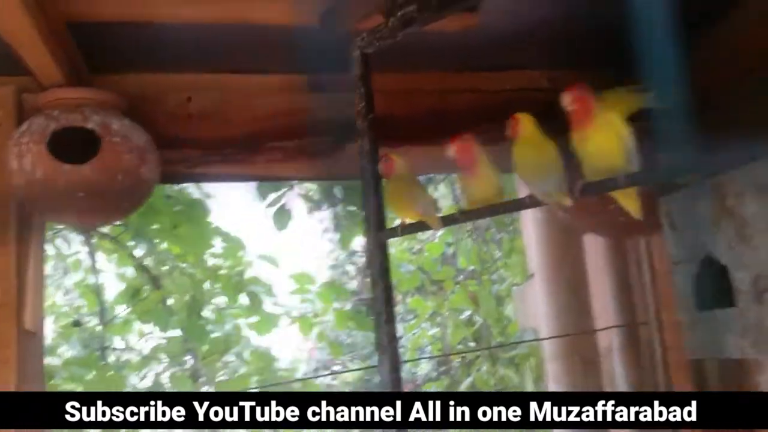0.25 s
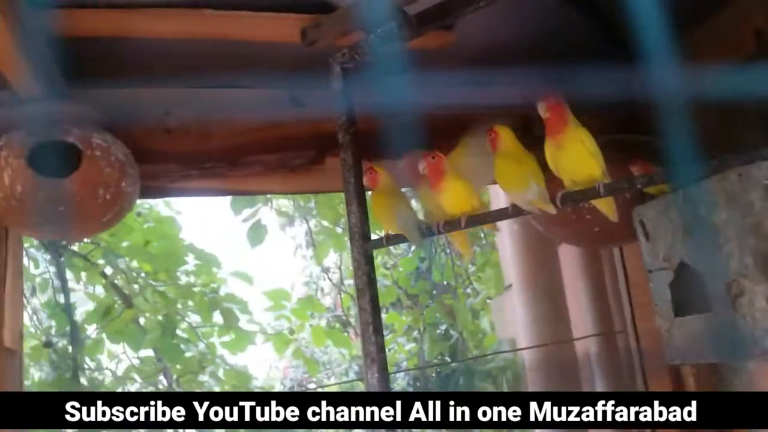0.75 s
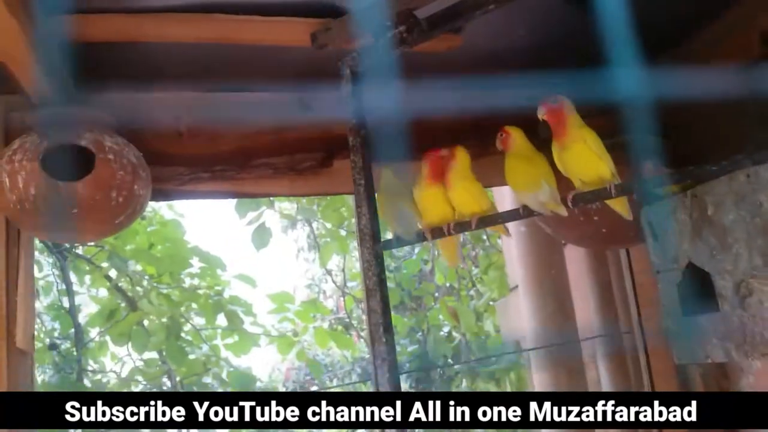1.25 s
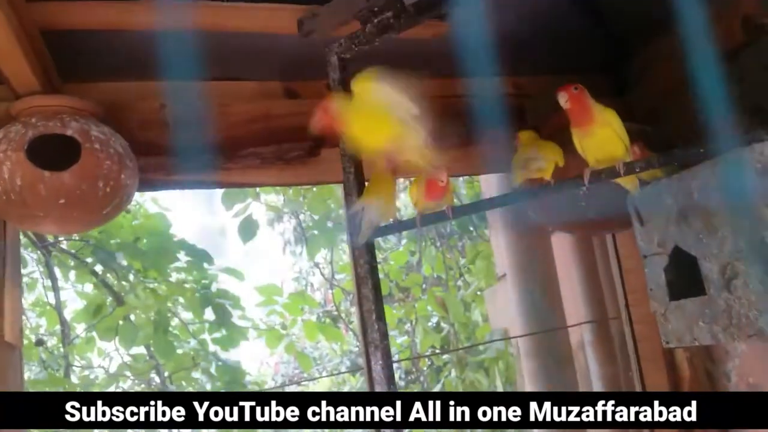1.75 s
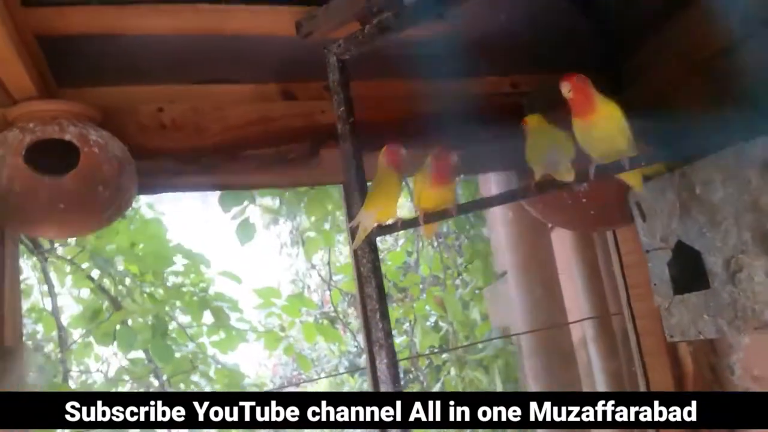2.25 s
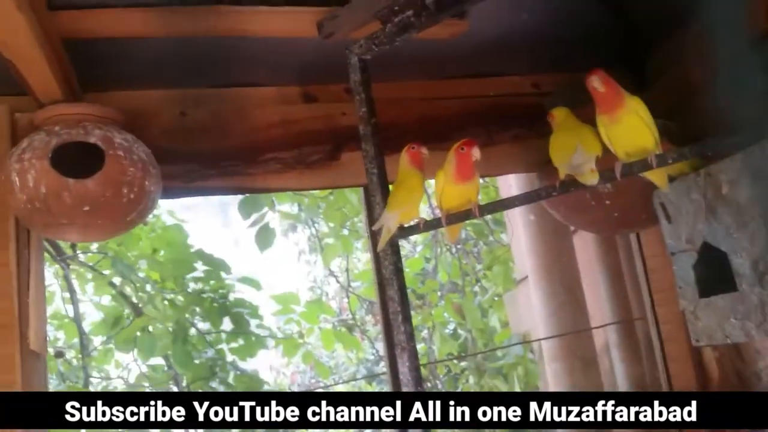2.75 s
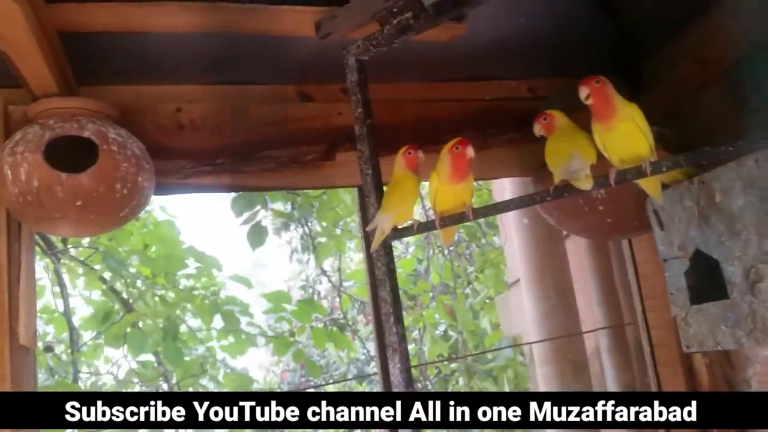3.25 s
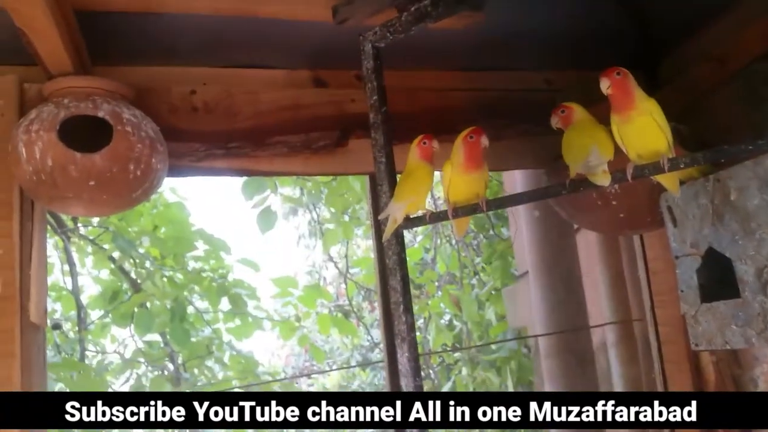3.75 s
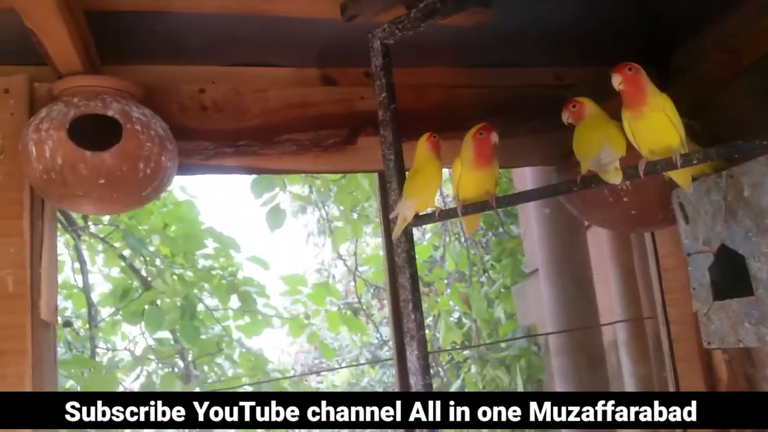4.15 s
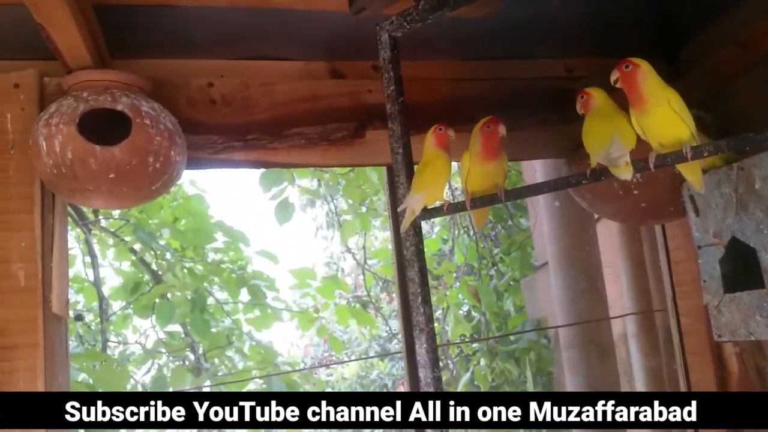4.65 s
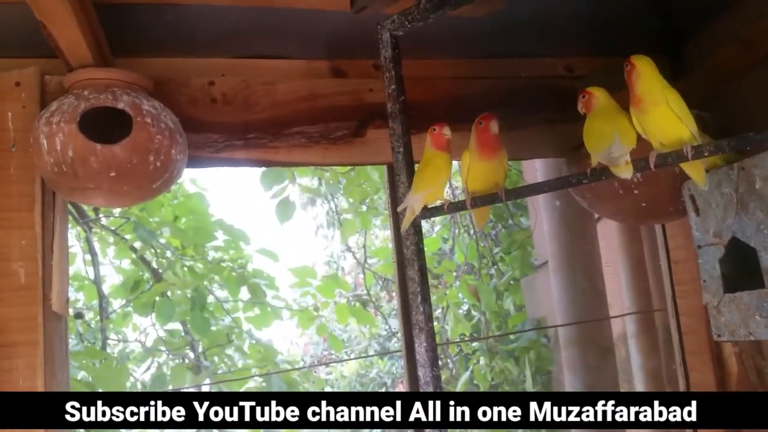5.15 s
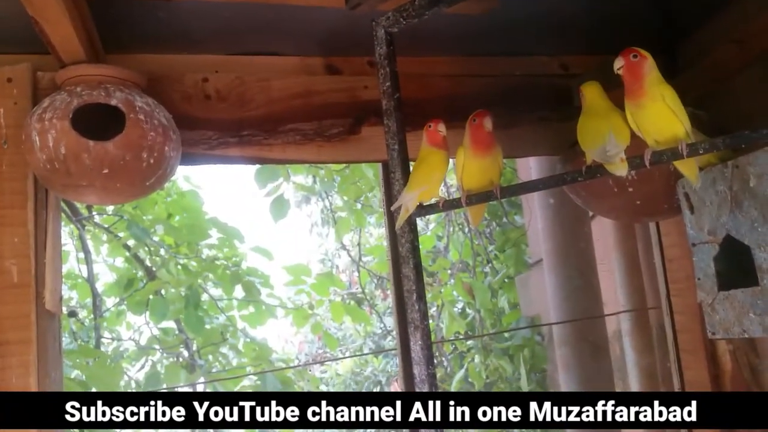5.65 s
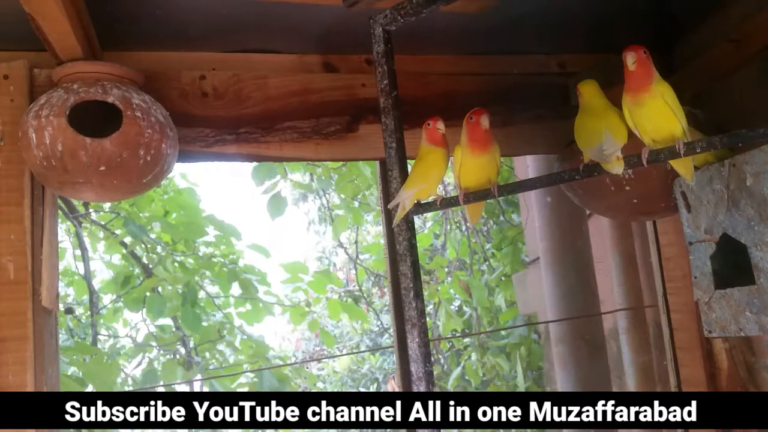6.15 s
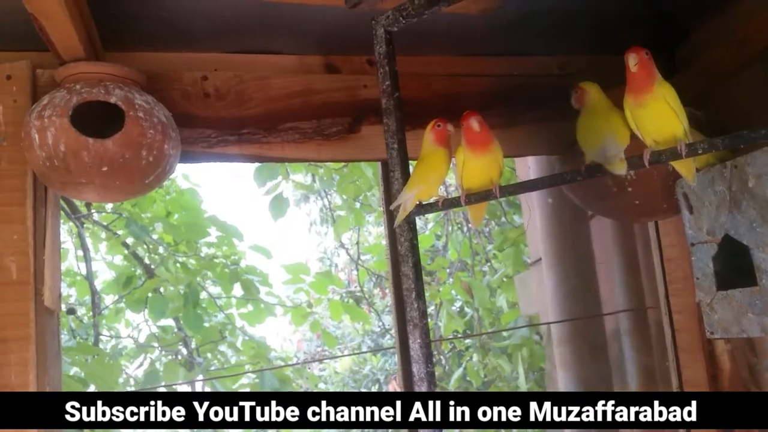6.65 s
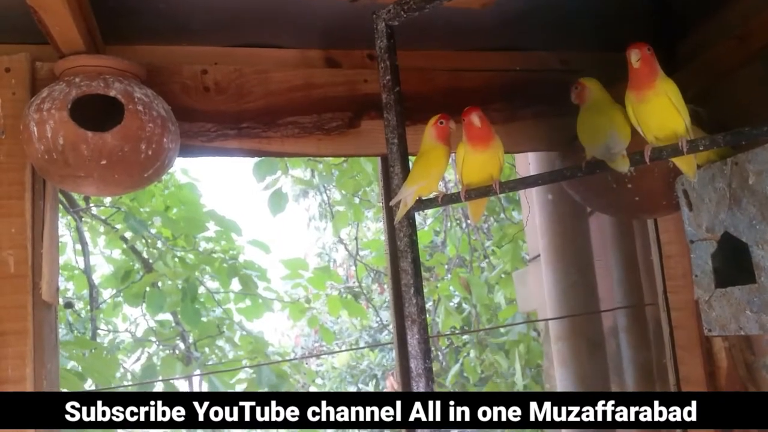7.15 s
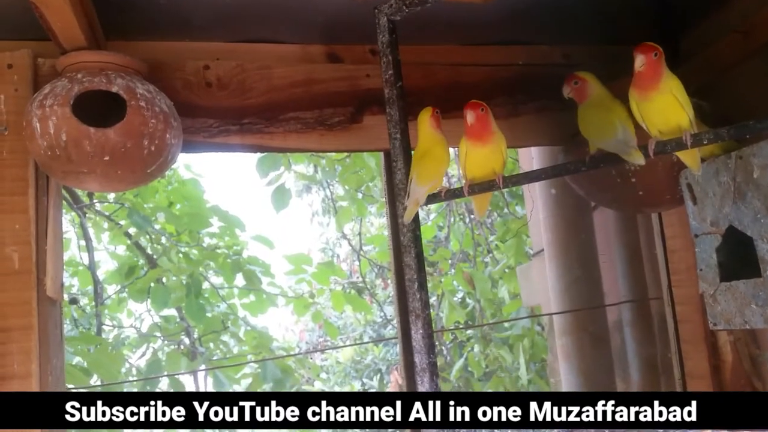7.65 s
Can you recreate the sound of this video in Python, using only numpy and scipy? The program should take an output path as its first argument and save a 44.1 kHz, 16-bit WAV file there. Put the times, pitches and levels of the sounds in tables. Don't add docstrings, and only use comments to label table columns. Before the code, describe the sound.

Scattered piercing lovebird squawks with wing gusts and handling knocks give way to a fast, steady run of sharp overlapping chirps.

```python
import sys
import numpy as np
from scipy import signal
from scipy.fft import rfft, irfft, next_fast_len
from scipy.io import wavfile
from scipy.ndimage import uniform_filter1d

SR = 44100
rng = np.random.default_rng(int(sys.argv[2]) if len(sys.argv) > 2 else 0)


def dump_mix(stems):
    frames = np.atleast_2d(stems).T
    limited = np.clip(frames, -1, 1)
    pcm = np.round(limited * 32767).astype(np.int16)
    wavfile.write(sys.argv[1], SR, pcm)


def decibels_to_gain(level_db):
    exponent = np.asarray(level_db, float) / 20
    return 10 ** exponent


N = 348831


def shape(x, table):
    size = next_fast_len(x.shape[-1])
    hz, db = np.transpose(table)
    bin_hz = np.arange(size // 2 + 1) * SR / size
    gain = decibels_to_gain(np.interp(np.log(bin_hz + 1), np.log(hz), db))
    return irfft(rfft(x, size) * gain, size)[..., :x.shape[-1]]


def unit(x):
    return x / np.sqrt(np.mean(x ** 2))


def walk(rate, size=N):
    k = max(int(SR / rate), 1)
    steps = np.repeat(rng.standard_normal(size // k + 1), k)
    return 1.27 * uniform_filter1d(uniform_filter1d(steps, k), k)[:size]


def swell(t, start, end, db, up_db_s, down_db_s):
    rise_db = up_db_s * np.maximum(start - t, 0)
    fade_db = down_db_s * np.maximum(t - end, 0)
    return decibels_to_gain(db - rise_db - fade_db) ** 2


def hiss():
    # hz, level_db
    cavity_colour = [(2200, -34), (3000, -8.5), (3600, 3), (4100, -5.5), (4800, -10.5), (5300, -39),
                     (6000, -44.5)]
    cavity = shape(rng.standard_normal(N), cavity_colour)
    veil = shape(rng.standard_normal((2, N)), [(5500, -48.5), (9000, -31.0), (11500, -15.0),
                                               (14000, -8.5), (15500, -3.5), (15900, -56.0)])
    return decibels_to_gain(-50) * unit(cavity) * np.array([[1], [.08]]) + decibels_to_gain(-74.5) * unit(veil)


def outdoors():
    # hz, level_db
    rumble_colour = [(18, -47.5), (30, -5), (76, -7), (257, -6), (433, -13.5), (484, -14), (522, -16),
                     (1380, -20.5), (2600, -35), (3380, -80), (5720, -120)]
    both, left, right = rng.standard_normal((3, N))
    ports = np.array([.5 * both + left, .5 * np.roll(both, 6) + 0.47 * right])
    return unit(shape(ports, rumble_colour)) * decibels_to_gain(-47 + walk(3.044))


def soft_whistles():
    # time_s, pitch_hz, level_db
    whistles = [
        [(4.0, 1760, -66), (4.03, 1720, -52), (4.06, 1480, -55), (4.09, 1476, -60), (4.11, 1790, -55.5),
         (4.16, 1830, -44), (4.21, 1678, -49), (4.25, 1635, -80)],
        [(4.28, 1360, -60.5), (4.33, 1275, -63), (4.44, 1216, -67), (4.5, 1285, -57)],
        [(3.745, 1990, -57), (3.775, 2230, -48), (3.79, 2930, -44)],
    ]
    out = np.zeros(N)
    for s, hz, db in map(np.transpose, whistles):
        add(out, s, hz, db, [0], -60, wobble=0.007, flutter_db=5.0, breath=0.059, rasp=0.0077, count=1)
    return out


def wings_and_fingers():
    # start_s, length_s, level_db
    gusts = [(0.13, 0.2, -46.5), (0.604, 0.15, -40.5), (1.633, 0.11, -39), (1.897, 0.095, -43),
             (2.157, 0.023, -37), (2.26, 0.28, -43.5), (6.474, 0.37, -52), (7.42, 0.031, -56.5),
             (7.74, .15, -49.5)]
    # peak_s, level_db
    strokes = [(2.89, -36.5), (3.04, -35.5), (3.17, -35), (3.315, -47), (3.35, -39.5), (3.39, -40.5),
               (3.43, -35.5), (3.46, -33), (3.49, -30), (3.52, -34.5), (3.555, -45), (4.05, -51.5)]
    t = np.arange(0, N, 64) / SR

    def strength(power):
        return np.interp(np.arange(N) / SR, t, np.sqrt(power))

    breeze = decibels_to_gain(-54) ** 2
    gust = strength(breeze + sum(swell(t, s, s + length, db, 254, 98.5) for s, length, db in gusts))
    grip = swell(t, 4, 4.73, -50, 93, 93)
    press = strength(grip + sum(swell(t, s, s, db, 204, 159) for s, db in strokes))

    shared, own = rng.standard_normal((2, N))
    low = unit(shape(shared, [(20, -10), (50, 0.5), (80, -0.5), (130, -2), (250, -10.0), (450, -9),
                              (900, -52.5)])) * decibels_to_gain(1.2 * walk(26))
    rub = unit(shape(own, [(20, -23.5), (80, 9.0), (200, 13.5), (400, 1.0), (900, -62)])) * decibels_to_gain(2.9 * walk(30))
    upper = unit(shape(own, [(250, -23.0), (400, -0.5), (800, -4.0), (1500, -9.0), (3000, -16.5),
                             (4500, -66.0)])) * decibels_to_gain(4.5 * walk(30))
    wings = (gust + 0.14 * press) * low
    fingers = press * (1.87 * rub + decibels_to_gain(-4.5) * upper)
    left = wings + decibels_to_gain(-8.0) * gust * upper + fingers
    right = np.roll(0.96 * wings + decibels_to_gain(-17.0) * gust * upper, 7)
    return np.array([left, right])


def knocks():
    # start_s, level_db, pitch_hz, decay_s, brightness_db
    bumps = [(2.856, -30, 124, 0.03, -28), (2.885, -24, 380, 0.042, -13.5), (2.923, -19, 150, 0.017, -24),
             (2.963, -33, 388, 0.04, -23), (3.013, -27, 109, 0.06, -22), (3.149, -28.5, 127, 0.12, -22),
             (3.333, -34.5, 185, 0.048, -13), (3.309, -35, 172, .05, -23), (3.476, -28, 157, 0.032, -20),
             (3.669, -20, 111, 0.036, -40), (3.841, -27.5, 80.7, 0.048, -24),
             (4.05, -17, 180, 0.031, -35.5), (4.112, -27, 107, 0.1, -59), (4.394, -22, 239, 0.03, -42),
             (4.519, -27, 247, 0.048, -24), (4.6, -29.5, 241, 0.073, -24), (6.48, -31, 80.7, 0.053, -31),
             (7.437, -25.5, 127, 0.055, -44.5)]
    out, t = np.zeros(N + SR), np.arange(SR // 4) / SR
    for s, db, hz, decay_s, bright_db in bumps:
        fall = decibels_to_gain(-60 * t / max(decay_s, .005)) * np.clip(t / 0.0023, 0, 1)
        scratch = shape(rng.standard_normal(len(t)), [(100, -22), (400, 9.0), (1500, -6.0), (4000, -13.5),
                                                      (9000, -94)])
        thump = np.sin(2 * np.pi * hz * t)
        first = int(s * SR)
        out[first:first + len(t)] += decibels_to_gain(db + 3.0) * fall * (thump + decibels_to_gain(bright_db + 12.5) * unit(scratch))
    return out[:N] * np.array([[1], [.2]])


def snaps():
    # start_s, level_db
    openings = [(0.066, -46), (0.613, -51), (.79, -52), (.955, -32), (1.64, -50), (1.895, -33), (2.11, -43),
                (2.487, -38), (2.607, -45), (3.793, -45), (3.855, -38), (1.703, -40), (3.391, -35),
                (4.631, -26), (7.027, -32.5)]
    out, t = np.zeros(N), np.arange(600) / SR
    for s, db in openings:
        puff = shape(rng.standard_normal(len(t)), [(900, -39.5), (1800, 10.5), (5000, 0), (9000, -10.0),
                                                   (15000, -11.5)])
        first = int(s * SR)
        out[first:first + len(t)] += decibels_to_gain(db - 60 * t / .014) * unit(puff)
    return out


def add(out, s, hz, db, orders_db, shrill_db, wobble=0.014, flutter_db=2.0, breath=0.25, rasp=0.27, count=8):
    # hz, level_db
    throat = [(3000, -33), (6500, 0), (9200, -3), (10500, -5.5), (13000, 0.5), (15300, -1.5), (16200, -54)]
    throat_hz, throat_db = np.transpose(throat)
    i = np.arange(int(s[0] * SR), min(int(s[-1] * SR), N))
    size = len(i)

    def at(column):
        return np.interp(i / SR, s, column + 0 * s)

    pitch = at(hz) * (1 + wobble * walk(255.4, size=size))
    beat_hz = 207 * (1 + 0.1995 * walk(40, size=size))
    pitch = pitch * (1 + 0.08 * rasp * np.sin(2 * np.pi * np.cumsum(beat_hz) / SR))
    phase = 2 * np.pi * (np.cumsum(pitch) / SR + rng.random())
    note = 0
    for k in range(1, count + 1):
        if k <= len(orders_db):
            gain_db = at(orders_db[k - 1])
        else:
            gain_db = at(shrill_db) + np.interp(k * pitch, throat_hz, throat_db, right=-99)
        leak = breath * walk(1500, size=size) + rasp * walk(5000, size=size)
        rough = 1 + k ** 0.62 * leak
        note = note + decibels_to_gain(gain_db + flutter_db * walk(179.2, size=size)) * rough * np.sin(k * phase)
    edge = np.clip(np.minimum(i - i[0], i[-1] - i) / (0.00019 * SR), 0, 1)
    out[i] += np.sqrt(2) * note * decibels_to_gain(at(db)) * edge


def low_note(out, start, length, hz, db, first_db, rasp, shrill_db, swell_db):
    t = np.linspace(0, length, num=40)
    attack_s = 0.0085
    level_db = db - 14 * np.clip(1 - t / attack_s, 0, 1) + swell_db * (t / length - .5)
    add(out, start + t, hz(t), level_db, [first_db, 0], shrill_db - 5.0, wobble=.33 * rasp,
        flutter_db=3.0 + 6.6 * rasp, breath=0.12 + 2.26 * rasp, rasp=rasp)


def low_notes(out):
    # start_s, length_s, pitch_hz, second_harmonic_db, fundamental_over_second_db
    scoops = [(.61, 0.062, 2125, -37, 0.5), (1.638, 0.066, 2226, -35, 2.5), (3.333, 0.057, 2182, -35.5, -5),
              (3.792, 0.06, 2193, -34.5, 3.5)]
    climbs = [(3.501, 0.066, 2080, -36, -3), (4.47, 0.066, 2097, -41, 1), (6.972, .028, 1894, -41.5, -6),
              (7.766, .072, 2130, -42, 1)]
    held = [(.982, 0.045, 2132, -30, -7), (1.298, 0.047, 2158, -33, -5.5), (2.486, 0.025, 2586, -32, -2.5),
            (7.0, 0.023, 1905, -38, -3.5)]
    # start_s, length_s, first_hz, turning_point_hz,
    # second_harmonic_db
    hoarse_bends = [(.066, 0.063, 2433, 2267, -38.5), (.221, 0.073, 2860, 2090, -35),
                    (.788, 0.071, 2876, 2285, -34), (.955, 0.096, 2414, 2720, -38), (1.268, 0.036, 2440, 2626, -39),
                    (1.891, 0.081, 2530, 2203, -37), (2.11, .075, 2680, 2296, -36),
                    (2.312, 0.078, 2720, 2378, -36.5), (4.575, 0.054, 2260, 2080, -39.5)]
    for rows, depth, climb in [(scoops, 0.23, 0.0236), (climbs, 0.23, .16), (held, 0, 0)]:
        for k, (s, length, hz, db, first_db) in enumerate(rows):
            def clear_hz(t):
                return hz * (1 - depth * np.exp(-t / 0.0063) + climb * t / length)

            low_note(out[k % 2], s, length, clear_hz, db, first_db, rasp=.03, shrill_db=-3, swell_db=5)
    for k, (s, length, first_hz, turn_hz, db) in enumerate(hoarse_bends):
        end_hz = turn_hz + 0.308 * (first_hz - turn_hz)

        def hoarse_hz(t):
            return np.interp(t / length, [0, .62, 1], [first_hz, turn_hz, end_hz])

        low_note(out[k % 2], s, length, hoarse_hz, db, -1.5, rasp=.085, shrill_db=1.2, swell_db=.3)


def high_notes(out):
    # start_s, early_hz, late_hz, level_db, shrillness_db
    long_high = [(0, 5250, 5220, -30.5, -1), (.118, 5123, 5193, -22.5, -2.5),
                 (.292, 5150, 5303, -22.5, -4.5), (.853, 4970, 5150, -23, -9.5),
                 (1.03, 5110, 5450, -24, -4), (2.18, 5220, 5350, -26, 0.5), (2.382, 5240, 5210, -24.5, -1),
                 (2.51, 4800, 4960, -22, -8), (2.632, 4680, 4590, -24.5, -11.5),
                 (3.392, 5200, 5380, -26, -1), (3.857, 5410, 5230, -23, 2.5),
                 (4.535, 5130, 5230, -26, -3.5), (7.836, 5190, 5210, -26, -3.5)]
    short_high = [(.672, 4780, 5060, -28, -7), (1.345, 5590, 5390, -23.5, -9),
                  (1.706, 5160, 5166, -28.5, -2), (1.965, 5070, 5170, -28, -1),
                  (2.622, 5440, 5020, -29.5, -2), (3.562, 5150, 5370, -21.5, -2),
                  (4.629, 5200, 5560, -27, 1), (4.632, 3934, 4380, -26.5, 0.5),
                  (4.65, 6760, 6640, -28, 1.5), (7.027, 5224, 5350, -28, -2.5)]
    yelps = [(1.0, 5380, 5030, -28, -2), (2.607, 3190, 2530, -31.5, -10.5), (2.609, 4410, 3490, -30, -6.5),
             (4.553, 6620, 6210, -31.5, 3)]
    for rows, length_s in [(long_high, 0.033), (short_high, 0.029), (yelps, .019)]:
        for k, (start, early_hz, late_hz, db, shrill_db) in enumerate(rows):
            s = np.maximum(start + length_s * np.array([0, .05, .45, .8, .999]), 0)
            middle_hz = 1.015 * (early_hz + late_hz) / 2
            hz = np.array([0.958 * early_hz, early_hz, middle_hz, late_hz, late_hz])
            add(out[k % 2], s, hz, db - np.array([8, 3.2, 2.46, 4.5, 16]), [0], shrill_db + 1.5,
                wobble=0.016, rasp=.075, count=4)


def squawks():
    out = np.zeros((2, N))
    low_notes(out)
    high_notes(out)
    return out


def chips():
    # break_s, plateau_hz, plateau_db, top_note_db, last_note_hz
    lead_chips = [(4.749, 4015, -19, -26, 4890), (4.852, 3767, -21, -26.5, 4700),
                  (4.959, 3763, -21.5, -28.5, 4666), (5.071, 3594, -23, -29.5, 4620),
                  (5.143, 4200, -18, -21.5, 4900), (5.252, 3945, -15, -19, 4960),
                  (5.358, 3863, -19.5, -20.5, 4690), (5.468, 4076, -15.5, -20, 4640),
                  (5.58, 3880, -17.5, -21, 4600), (5.693, 3940, -17.5, -21, 4570),
                  (5.81, 3840, -16.5, -23, 4510), (5.93, 3850, -18, -22.5, 4500),
                  (6.053, 3945, -17, -21.5, 4560), (6.177, 3846, -20, -23, 4420),
                  (6.303, 3830, -18, -21.5, 4450), (6.434, 3780, -22, -26, 4440)]
    # break_s, plateau_hz, plateau_db, last_note_hz, last_note_db
    partner_chips = [(5.181, 3900, -19.5, 4620, -23), (5.31, 3890, -19.5, 4555, -24.5),
                     (5.43, 3994, -16.5, 4654, -21), (5.545, 3776, -21.5, 4326, -21),
                     (5.662, 3834, -23.5, 4333, -22), (5.784, 3886, -21, 4365, -24),
                     (5.903, 3813, -21.5, 4364, -24)]
    # time_from_break_s, pitch_over_plateau (ratio), level_over_plateau_db
    onset = [(-.033, .4, -24), (-.031, .58, -24), (-.028, .62, -17), (-.0245, .67, -18), (-.0235, .9, -18),
             (-.019, .94, -8), (-.01, .99, -2.5), (-.001, 1.05, -1)]
    out = np.zeros((2, N))
    lead, ratio, lead_db = np.transpose(onset)
    lead_shrill_db = -8.0 + .45 * lead_db

    after = np.array([-.001, .0006, .009, .011, 0.0092, 0.018, 0.037])
    for s, hz, db, top_db, last_hz in lead_chips:
        pace, height = 1 + np.array([.07, .015]) * rng.standard_normal(2)
        last_notes_hz = last_hz * np.array([1.03, .995, .99])
        pitch = np.r_[hz * ratio, 5000, 6350 * height, 6300 * height, 5300, last_notes_hz]
        top_notes_db = top_db - np.array([12.0, 1.5, 2.5, 12.0])
        level_db = np.r_[db - 4.0 + lead_db, top_notes_db, -31, -32, -38]
        shrill_db = np.r_[lead_shrill_db, -2, 0, 1.5, 0, -1.5, -1.5, -3]
        add(out[0], s + np.r_[pace * lead, after], pitch, level_db, [0], shrill_db,
            wobble=0.015, flutter_db=5.0, breath=0.18, rasp=0.091, count=3)

    after = np.array([.0015, .006, .012, .034])
    for s, hz, db, last_hz, last_db in partner_chips:
        pitch = np.r_[hz * ratio, last_hz * np.array([1.15, 1.1, 1.01, .99])]
        level_db = np.r_[db - 4.0 + lead_db, last_db - np.array([2.5, 3, 4, 9])]
        shrill_db = np.r_[lead_shrill_db, -6, -5, -3, -4]
        add(out[1], s + np.r_[1.05 * lead, after], pitch, level_db, [0], shrill_db,
            wobble=0.013, flutter_db=3.5, breath=0.22, rasp=0.16, count=3)
    return out


def shed(x, lag):
    # hz, level_db
    planks = [(1500, -5), (2600, -2), (4200, 0), (6000, -2.5), (15000, -1.5)]
    t = np.arange(int(.5 * SR)) / SR

    def fading_noise(t60_s):
        return rng.standard_normal((2, len(t))) * decibels_to_gain(-60 * t / t60_s)

    def energy(v):
        return v / np.sqrt(np.sum(v ** 2, axis=1, keepdims=True))

    tail = fading_noise(0.19) * np.clip(t / 0.0024, 0, 1)
    early = fading_noise(.055) * (rng.random(len(t)) < .02) * (t > .0015)
    yard = fading_noise(0.48) * (t > .03)
    response = shape(decibels_to_gain(-26.5) * energy(yard) + decibels_to_gain(-9.5) * energy(tail), planks)
    response = response + decibels_to_gain(-5) * energy(early)
    response[0, int(max(-lag, 0))] = 1
    response[1, int(max(lag, 0))] = .4
    return signal.fftconvolve(x[None], response, axes=1)[:, :N]


def scene():
    # hz, level_db
    left_port = [(1000, 0), (5400, 0), (5900, -12), (6400, -1.5), (7100, -6), (7700, -23), (8300, -25),
                 (9000, -5), (10000, 0), (15500, 0), (15900, -45)]
    # hz, level_db
    right_port = [(100, -15.5), (1000, -25), (2200, -0.5), (4500, -2.5), (8000, 0.5), (12000, -15.5),
                  (16000, 2)]
    near, middle = squawks()
    callers = [near, middle + snaps(), *chips(), soft_whistles()]
    lags = [5.0, -12.5, 17.5, 14.5, 15]
    birds = shape(sum(shed(x, lag) for x, lag in zip(callers, lags)), left_port)
    birds[1] = shape(birds[1], right_port)
    return decibels_to_gain(4.5) * birds + outdoors() + wings_and_fingers() + knocks() + hiss()


def top_cut(x):
    return signal.sosfilt(signal.butter(12, 16850, fs=SR, output="sos"), x)


def record(dry):
    rounded = np.tanh(1.742 * dry) / 1.53
    mix = shape(rounded, [(15500, 0), (15900, -36.5), (16500, -71.5)])
    return top_cut(mix)


dry = scene()
out = record(dry)
dump_mix(out)
```